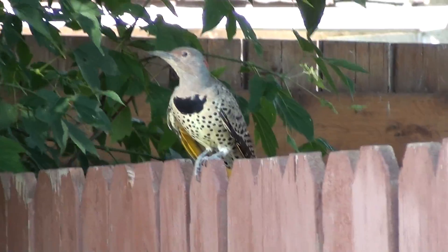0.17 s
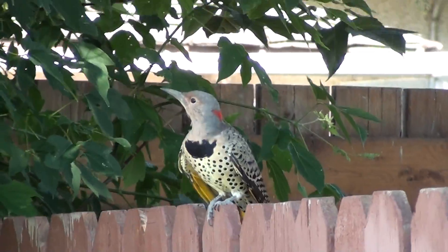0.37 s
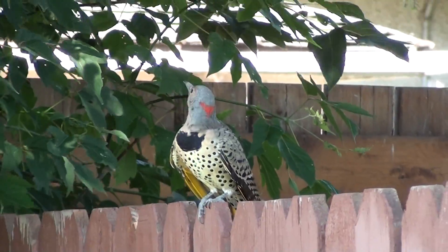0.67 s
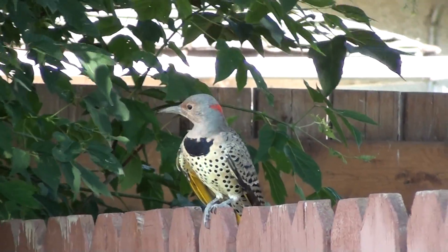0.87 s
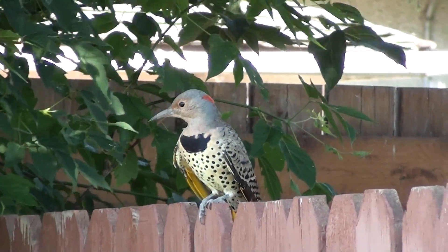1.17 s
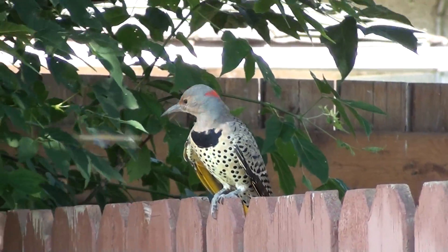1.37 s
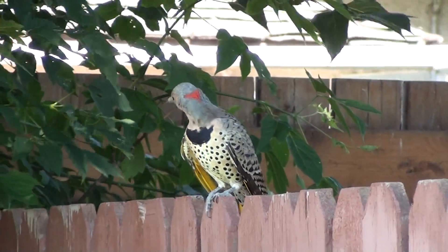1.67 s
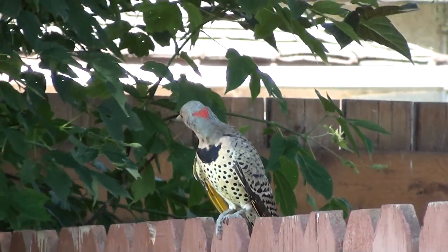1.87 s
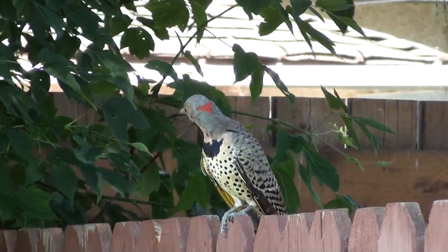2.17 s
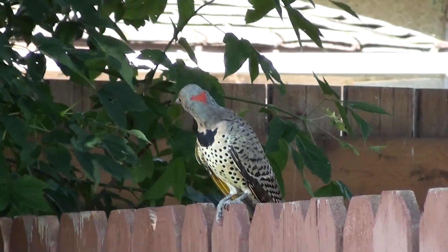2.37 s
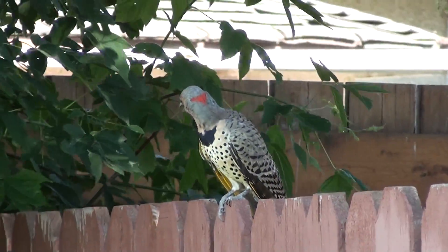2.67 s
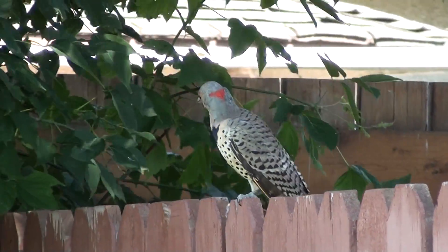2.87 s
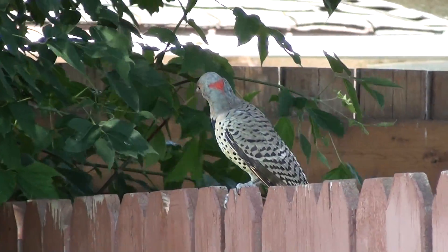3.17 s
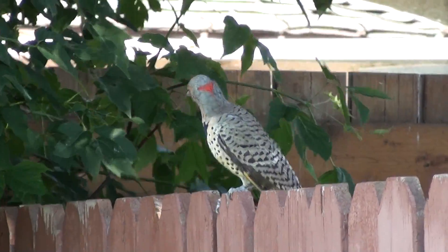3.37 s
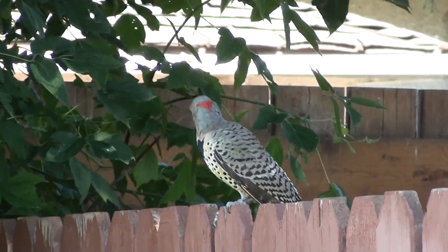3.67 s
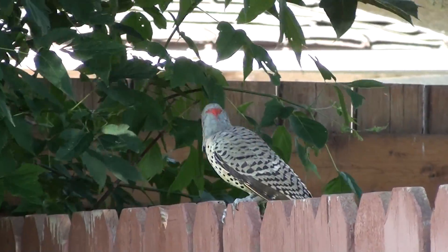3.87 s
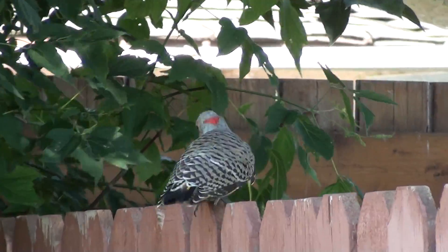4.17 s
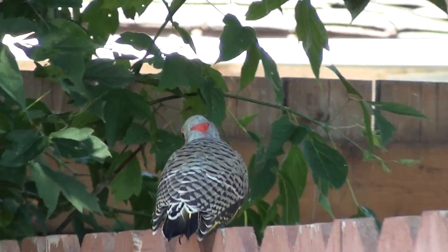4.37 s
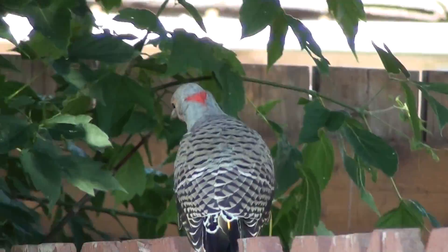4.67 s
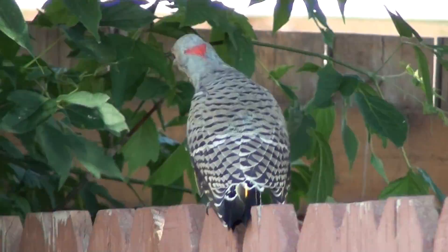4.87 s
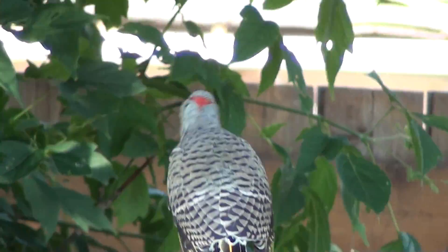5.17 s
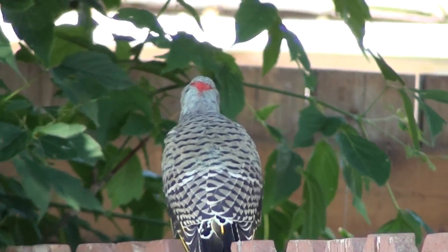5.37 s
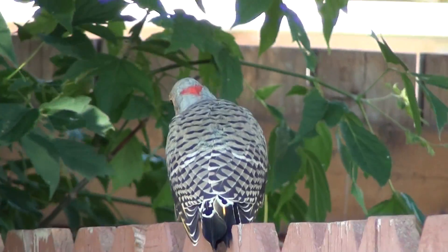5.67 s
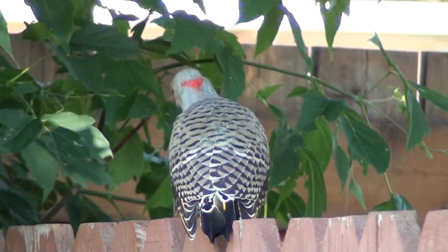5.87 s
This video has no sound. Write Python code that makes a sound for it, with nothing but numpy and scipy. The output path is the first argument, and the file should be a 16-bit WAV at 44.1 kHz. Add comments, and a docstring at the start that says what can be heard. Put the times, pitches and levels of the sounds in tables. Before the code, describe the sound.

Handheld camera outdoors: steady faint hiss, low distant traffic, sparse tiny chirps. Just before the middle comes a woodpecker's abrupt bright call, a short squeaky cry dropping in pitch with a brief yard echo. Then a faint engine climbs streets away, light plastic ticks and dry leafy rustles lead to one sharp loud clack, more small chirps, and a second similar cry shortly before the abrupt end.

```python
"""Two loud falling cries of a woodpecker on a backyard fence, echoing off walls nearby.
Small birds chirp far off, dry rustles pass, a vehicle speeds up streets away and the town hums.
The hand-held camera adds hiss, ticks of its plastic body and the thin whine of its lens motor.
Cries are overtones of a gliding pitch shaped by a throat; chirps, whine and engine are sine tones;
ticks are short ringing tones; rustles, rumble, hum and hiss are shaped noise."""
import sys
import numpy as np
from scipy import signal
from scipy.fft import rfft, irfft
from scipy.io import wavfile
from scipy.ndimage import uniform_filter1d, map_coordinates

SR = 44100
rng = np.random.default_rng(int(sys.argv[2]) if len(sys.argv) > 2 else 0)


def store_pcm(level_fs):
    """Save levels as 16-bit WAV."""
    pcm = np.round(np.clip(level_fs, -1, 1) * 32767).astype(np.int16)
    wavfile.write(sys.argv[1], SR, np.atleast_2d(pcm).T)


def gain_from_db(level_db):
    """Turn a decibel level (scalar or array-like) into a linear amplitude factor."""
    decades = np.asarray(level_db, float) / 20
    return 10 ** decades


N = 266187  # length of the scene (samples)


def woodpecker():
    """Each cry arrives straight, then off the near walls, then as echoes from the whole yard."""
    # the notes of each cry, one row per shape:
    # (start [s], length [s], pitch over the shape's [ratio], level [dB], added upper overtones [dB])
    cry_notes = [
        [(2.708, 0.0069, 1, -18.5, -1), (2.715, 0.02, 0.99, -14, 0), (2.732, 0.031, 0.98, -8, -3),
         (2.765, 0.17, 0.99, -15.5, 3.5)],
        [(5.674, 0.0065, 1.02, -24, -5), (5.68, .016, 1, -15, -1.5), (5.695, 0.042, 1.01, -8.5, -4),
         (5.728, 0.18, 1.013, -15, 0.5)],
    ]
    # the four notes of a cry, the two sides of the voice box taking turns:
    # (share of the note [0-1], pitch [Hz], level [dB], upper overtones [dB])
    note_shapes = [
        [(0, 3120, -12, -12), (.5, 3110, 0.5, -12), (1, 3040, 2, -12)],
        [(0, 2036, -4, -9), (.23, 1660, -6, -4), (.5, 1607, 0.5, 0.5), (.77, 1850, -0.5, 1),
         (1, 2330, -8.5, -15)],
        [(0, 3423, -13, -30), (.23, 3222, -4.5, -35), (.6, 3134, 1, -50), (.86, 3020, -5.5, -41),
         (1, 3020, -12, -22)],
        [(0, 2206, -16, -15), (.04, 1924, 2, -1), (.1, 1800, -4, 8.5), (.27, 1502, 0, -4.5),
         (.38, 1434, -6.5, 0), (.43, 1261, -4, -4.5), (.51, 1053, -12, 3), (.57, 988, -16, -7),
         (.72, 1006, -19, -8), (1, 950, -25, -14)],
    ]
    # tone of the straight path, one list per cry: (frequency [Hz], level [dB])
    straight_tone = [
        [(1500, -1), (3200, 1), (5500, 0.5), (9000, 1), (14000, -10)],
        [(1500, -2.5), (3200, -0.5), (5500, -0.5), (9000, -0.5), (14000, 3)],
    ]
    # hoarseness of each cry: (flutter at 3 kHz [radians])
    hoarseness = [.1, .13]
    # air hisses as the voice changes sides into the third and fourth note: (level [dB])
    rasp_levels = [-26.5, -32]
    # tone of that hiss: (frequency [Hz], level per Hz [dB])
    rasp_tone = [(3000, -28), (5000, -2), (8500, 2), (11000, -4), (15000, -18)]
    # left-right balance of the cry: (frequency [Hz], left over right [dB])
    cry_lean = [(1500, -1), (3100, -2.1), (4500, .3), (9000, .5), (14000, 0)]
    # walls and fence around the perch: (delay [ms], level [dB], left over right [dB])
    wall_echoes = [(3.965, -14, 2), (5.602, -18.5, 9.5), (8.766, -10.5, 3), (13.544, -11, -1),
                   (17.18, -15, -7), (21.8, -10.5, 3.5), (35.5, -17.5, 7), (44.54, -10.5, -3)]

    out = np.zeros((2, N))
    puff = np.hanning(SR // 100)
    for notes, facing, flutter in zip(cry_notes, straight_tone, hoarseness):
        start = notes[0][0] - .01
        cry = np.zeros(SR // 3)
        for (s, length, ratio, db, bright_db), shape in zip(notes, note_shapes):
            rows = np.array(shape) * [length, ratio, 1, 1] + [s, 0, db, bright_db]
            add(cry, s - start, note(rows, jitter=.002, flutter=flutter))
        for (s, *_), db in zip(notes[2:], rasp_levels):
            hiss = unit(coloured(rng.standard_normal(len(puff)), rasp_tone))
            add(cry, s - start - .004, gain_from_db(db) * puff * hiss)
        near = ports(np.array([cry, 0 * cry]), [(1000, 0.83)], cry_lean)
        add(out, start, coloured(near, facing))
        for ms, db, pan_db in wall_echoes:
            sides = gain_from_db([[db + pan_db / 2], [db - pan_db / 2]])
            add(out, start + ms / 1000, near * sides)
        echoes = yard(cry, cry_lean, gap_ms=22)
        add(out, start, gain_from_db(-3.5) * echoes)
    return out


def note(rows, jitter, flutter):
    """Overtones of a gliding pitch through the throat; the higher ones flutter more."""
    # the voice box favours its octave: (overtone [multiple of the pitch], level [dB])
    voice_box = [(1, -7), (2, -0.5), (3, -8), (4, -8.5), (6, -10.5), (14, -15)]
    # throat and open bill: (frequency [Hz], level [dB])
    throat = [(900, 3), (1200, -9.5), (1600, -2), (2200, 3), (3100, 2.5), (3900, -3), (4400, -5.5),
              (4900, -5.5), (5600, -8), (6300, -6.5), (7600, -11), (9300, -5.5), (11000, -25), (15000, -32)]

    t = np.arange(rows[0][0], rows[-1][0], 1 / SR)
    pitch, db, upper_db = curves(rows, t)
    pitch = uniform_filter1d(pitch, size=90) * (1 + jitter * wobble(496, size=len(t)))
    k = np.arange(1, 15)[:, None]  # overtone numbers
    level_db = np.interp(k, *np.transpose(voice_box)) + along(throat, k * pitch)
    # the upper overtones' level comes in from 4500 Hz and is full at 9000 Hz
    level_db = level_db + upper_db * np.clip((k * pitch - 4500) / 4500, 0, 1)
    # two sets of random curves: one shakes the loudness, one the phase
    curves_each = np.array([[wobble(400, size=len(t)) for _ in k] for _ in "ab"])
    shake = flutter * (k * pitch / 3000) ** 2 * curves_each
    phase = k * 2 * np.pi * np.cumsum(pitch) / SR + shake[1]
    audible = k * pitch < SR / 2.8  # leave out overtones that are too high
    tones = gain_from_db(level_db) * (1 + np.tanh(shake[0])) * audible * np.sin(phase)
    soft_ends = signal.windows.tukey(len(t), min(1, 120 / len(t)))
    return gain_from_db(db) * soft_ends * tones.sum(0)


def yard(x, lean, gap_ms):
    """Scattered echoes build up over gap_ms, then each frequency dies away at its own speed."""
    # (frequency [Hz], time to fade by 60 dB [s])
    fade_times = [(900, 0.46), (2000, 0.392), (3200, 0.47), (6000, 0.46), (9000, 0.25), (14000, 0.67)]
    # (frequency [Hz], left-right likeness [0-1])
    echo_likeness = [(1000, .92), (3000, .88), (5000, .78), (9000, .96), (12000, .998)]

    hz, t, z = signal.stft(rng.standard_normal((2, SR // 2)), SR, nperseg=256)
    fading = gain_from_db(-60 * t / along(fade_times, hz)[:, None])
    tail = signal.istft(z * fading, SR, nperseg=256)[1]
    build_up = 1 - np.exp(-np.arange(tail.shape[1]) / SR * 1000 / gap_ms)
    tail = tail / np.linalg.norm(tail[0]) * build_up
    return signal.fftconvolve(x[None], ports(tail, echo_likeness, lean), axes=1)


def clear_whistles():
    """Far small birds whistle short clear glides of a sine tone."""
    # (start [s], length [s], from [Hz], to [Hz], level [dB])
    whistle_calls = [ (.477, 0.011, 6450, 7300, -46), (.55, 0.0079, 5300, 6900, -41.5),
                     (.559, .02, 6954, 6750, -44), (.577, 0.019, 6770, 7150, -44),
                     (.598, .005, 6940, 3130, -41.5), (.623, .01, 7300, 7100, -42.5),
                     (.658, .01, 5300, 5350, -51), (.67, 0.01, 3000, 2700, -51),
                     (.68, .009, 5800, 5350, -45), (.693, 0.015, 5900, 6030, -42),
                     (.69, 0.025, 4236, 4360, -52), (.704, 0.0091, 4350, 2800, -50),
                     (.744, .0063, 4400, 3100, -53), (1.275, 0.0167, 5040, 5140, -56),
                     (1.293, 0.056, 5320, 5250, -56), (1.298, .02, 5800, 6000, -54),
                     (5.014, .01, 5330, 6500, -48), (5.035, 0.039, 6600, 7194, -44),
                     (5.068, .0057, 6800, 3700, -43), (5.127, .006, 5400, 6100, -50),
                     (5.139, .013, 2760, 5600, -48), (5.154, 0.0203, 5400, 6050, -48),
                     (5.16, .014, 4420, 4640, -50), (5.171, 0.0088, 5300, 2900, -48)]
    return small_birds(whistle_calls, rough=0.13, pan_db=-0.12, echo_db=-5.5, gap_ms=1.9)


def hoarse_cheeps():
    """Birds deeper in the yards cheep in rougher glides with stronger echoes."""
    # (start [s], length [s], from [Hz], to [Hz], level [dB])
    cheep_calls = [(.242, 0.0416, 4200, 3270, -57.5), (.781, .035, 4850, 4010, -56),
                   (.797, 0.048, 3066, 3065, -46), (1.615, .03, 4150, 4200, -53),
                   (1.638, 0.077, 3913, 3180, -54.5), (1.841, 0.055, 4480, 3010, -54),
                   (2.66, .069, 4100, 3328, -51), (3.343, .069, 4720, 3200, -53),
                   (4.02, 0.096, 4145, 3320, -50), (4.93, 0.03, 3980, 3780, -54.5),
                   (5.281, 0.088, 4660, 3310, -52)]
    return small_birds(cheep_calls, rough=0.455, pan_db=1, echo_db=2.5, gap_ms=2.1)


def small_birds(calls, rough, pan_db, echo_db, gap_ms):
    """Whistled glides whose pitch warbles fast, more so when rough, with echoes of the yards."""
    straight = np.zeros(N)
    for s, length, from_hz, to_hz, db in calls:
        u = np.arange(round(length * SR)) / (length * SR)  # share of the call, 0 to 1
        warble = wobble(422.5, size=SR // 4)[:len(u)]
        pitch = (from_hz + (to_hz - from_hz) * u) * (1 + .13 * rough * warble)
        rise_and_fall = np.sin(np.pi * u) ** .5
        add(straight, s, gain_from_db(db) * rise_and_fall * np.sin(2 * np.pi * np.cumsum(pitch) / SR))
    echoes = yard(straight, [(1000, pan_db)], gap_ms)[:, :N]
    return straight * gain_from_db([[pan_db / 2], [-pan_db / 2]]) + gain_from_db(echo_db) * echoes


def camera():
    """Ticks set the plastic body ringing at its own pitches, each tick with its own brightness."""
    # (start [s], peak level [dB], brightness [dB per octave])
    body_ticks = [(0.059, -28.5, -6), (0.076, -30, -0.5), (1.593, -34, 16), (3.179, -44, 4.5),
                  (3.687, -37.5, 11), (3.719, -38, 10), (3.971, -39, 5), (4.002, -42, 1), (4.014, -39, 6.5),
                  (4.152, -32, 10), (4.18, -24.5, 33), (4.561, -5.5, 2), (4.659, -36, -2), (4.736, -36, 1),
                  (4.873, -40, 18)]
    # pitches at which the body rings: (frequency [Hz], level [dB], time to fade by 60 dB [s])
    body_modes = [(540, -27, 0.023), (590, -30.5, 0.057), (810, -21.5, 0.023), (1106, -15, 0.023),
                  (1756, -17.5, 0.021), (2300, -27, 0.037), (2490, -20, 0.022), (3070, -14.5, 0.0093),
                  (3150, -1.5, 0.0033), (3280, -20, 0.019), (4240, -17, 0.02), (4720, -13.5, 0.013),
                  (5680, -20.5, 0.011), (6200, -33, 0.012), (6380, -18.5, 0.011), (7010, -8.5, 0.0049),
                  (7650, -19, 0.0088), (7860, -12, 0.0046), (9130, -27.5, .01), (9720, -26, 0.0095),
                  (10100, -36, .012), (11460, -40, 0.0091)]

    out = np.zeros(N)
    t = np.arange(SR // 20) / SR
    hz, db, t60 = np.transpose(body_modes)[:, :, None]
    soft = 1 - np.exp(-(t / .0003) ** 2)  # softens the first instant
    for s, peak_db, tilt_db in body_ticks:
        level_db = db + tilt_db * np.log2(hz / 4000) + rng.normal(0, 1, hz.shape)
        phase = 2 * np.pi * (hz * t + 0.2 * rng.standard_normal(hz.shape))
        ring = soft * (gain_from_db(level_db - 60 * t / t60) * np.sin(phase)).sum(0)
        add(out, s, gain_from_db(peak_db) * ring / np.abs(ring).max())
    return out


def lens(time):
    """The lens motor sings a few thin unsteady lines whenever it moves."""
    # (frequency [Hz], level [dB])
    motor_lines = [(4400, -2), (5750, -5), (7050, 1), (8100, -15)]
    # (middle [s], level [dB], span [s], brightness [dB per octave])
    motor_moves = [(2.6, -58.5, 0.079, 3), (3.43, -59, .08, 7), (4.44, -66, 0.19, -12)]

    out = np.zeros(N)
    for hz, line_db in motor_lines:
        octaves = np.log2(hz / 7000)
        moving = sum(gain_from_db(db + tilt_db * octaves) * swell(time, s, span)
                     for s, db, span, tilt_db in motor_moves)
        loudness = moving * gain_from_db(line_db + 3 * wobble(25))
        out += loudness * np.sin(2 * np.pi * hz * time + 1.1 * wobble(110))
    return out


def rustle(time):
    """Dry rustles: high noise whose loudness jumps about in clumps."""
    # (middle [s], level [dB], span [s])
    rustle_times = [(4.04, -57, 0.0265), (4.14, -55, 0.017), (4.19, -53, 0.024), (4.35, -59.5, .15),
                    (4.7, -62, 0.052)]
    # (frequency [Hz], level per Hz [dB])
    rustle_tone = [(3000, -25.5), (5500, 0), (8500, 1), (10000, -7), (13000, -9), (16000, -19.5)]

    grains = rush(rustle_tone, patchy_db=4)
    loudness = sum(gain_from_db(db) * swell(time, s, span) for s, db, span in rustle_times)
    return loudness * unit(gain_from_db(3.3 * wobble(90)) * grains)


def vehicle(time):
    """Exhaust tones at multiples of the crank's speed climb with it, a little unsteady."""
    # (time [s], crank speed [turns per second])
    engine_speed = [(2.4, 20), (2.75, 21.9), (3.2, 24.1), (3.6, 26), (3.9, 27), (4.2, 27.7), (4.6, 28.2)]
    # exhaust tones, each carrying over the roofs for a while:
    # (multiple of the crank speed, level [dB], loudest at [s], span [s])
    exhaust_orders = [(5, -48, 3.28, 0.62), (7, -50.5, 3.78, 0.44), (9, -48, 3.87, 0.337),
                      (11, -49, 3.67, 0.35), (12, -50.5, 3.68, 0.48), (13, -53.5, 3.57, 0.26),
                      (14, -49.5, 3.67, 0.2)]

    turn = 2 * np.pi * np.cumsum(curves(engine_speed, time)[0]) / SR
    orders = 0
    for k, db, s, span in exhaust_orders:
        loudness = gain_from_db(db + 1.6 * wobble(5)) * swell(time, s, span)
        orders = orders + loudness * np.sin(k * turn + .5 * wobble(6))
    return orders * gain_from_db([[-.5], [.5]])


def town(time):
    """Far traffic is slowly wavering noise, rumble and hum, over the microphone's own even hiss."""
    # (time [s], rumble level [dB], hum level [dB])
    town_levels = [(0, -53, -48.5), (2.5, -54.5, -47.5), (3, -54, -45.5), (4.5, -55, -46), (5, -58.5, -48),
                   (6, -55.5, -48)]
    # tone of each layer: (frequency [Hz], level per Hz [dB])
    rumble_tone = [(12, -38), (22, -30), (32, -29), (45, -33), (55, -1.5), (65, 5), (97, 2), (140, -1),
                   (200, -24), (260, -35), (440, -120)]
    hum_tone = [(88, -12), (150, 0), (395, -4), (431, -6), (787, -4), (2170, -20), (2370, -37),
                (2470, -11.5), (2660, -27), (3730, -25), (5000, -28), (6500, -26.5), (11000, -120)]
    hiss_tone = [(1180, -1.5), (2000, -2.5), (2380, -4.5), (2460, 0.5), (2670, -3.5), (6310, -8.5),
                 (7640, -7), (15100, -12), (16000, -15)]

    rumble_db, hum_db = curves(town_levels, time)
    low = gain_from_db(rumble_db + 0.31 * wobble(4.0)) * rush(rumble_tone, patchy_db=0.1)
    hum = gain_from_db(hum_db + 1.3 * wobble(4.924)) * rush(hum_tone, patchy_db=0.96)
    hum = hum * gain_from_db([[-.3], [.3]])
    return low + hum + gain_from_db(-54.0) * rush(hiss_tone, patchy_db=1.3)


def rush(spectrum, patchy_db):
    """Stereo noise of rms 1 with patches of random gain."""
    # (frequency [Hz], left-right likeness [0-1])
    noise_likeness = [(60, 0.989), (130, 1), (290, 0.937), (640, 0.84), (1410, 0.63), (3100, 0.603),
                      (6820, 0.83), (15000, 1)]

    z = signal.stft(rng.standard_normal((2, N + 512)), nperseg=512)[2]
    # random gains smoothed over frequency, then over time
    field = uniform_filter1d(rng.standard_normal(z.shape[1:]), 5, 0)
    field = uniform_filter1d(field, 12, 1)
    pair = signal.istft(z * gain_from_db(patchy_db * unit(field)), nperseg=512)[1][:, :N]
    return unit(ports(coloured(pair, spectrum), noise_likeness, [(1000, 0)]))


def ports(pair, alike, lean):
    """Two signals mixed into left and right with a likeness and a balance for each frequency."""
    n = pair.shape[1]
    hz = np.fft.rfftfreq(n, 1 / SR)
    angle = np.arccos(np.clip(along(alike, hz), -1, 1)) / 2
    mid, side = rfft(pair) * [np.cos(angle), np.sin(angle)]
    balance = gain_from_db(np.outer([.5, -.5], along(lean, hz)))
    return irfft(np.array([mid + side, mid - side]) * balance, n)


def coloured(x, spectrum):
    """x shaped by (frequency [Hz], level [dB]) points."""
    n = x.shape[-1]
    return irfft(rfft(x) * gain_from_db(along(spectrum, np.fft.rfftfreq(n, 1 / SR))), n)


def swell(time, s, span):
    """A bell-shaped rise and fall around second s."""
    return np.exp(-((time - s) / span) ** 2 / 2)


def wobble(rate, size=N):
    """A smooth random curve through rate random points a second."""
    return map_coordinates(rng.standard_normal(size // 32 + 8), [np.arange(size) * rate / SR])


def unit(x):
    """x at rms 1."""
    return x / np.sqrt(np.mean(x ** 2) + 1e-20)


def along(points, hz):
    """(frequency [Hz], value) points read on a log axis."""
    f, v = np.transpose(points)
    return np.interp(np.log(hz + 1), np.log(f + 1), v)


def curves(rows, t):
    """Each column after the time, read at times t."""
    s, *cols = np.transpose(rows)
    return [np.interp(t, s, c) for c in cols]


def add(track, s, sound):
    """Mix sound into track from second s."""
    part = track[..., round(s * SR):][..., :sound.shape[-1]]
    part += sound[..., :part.shape[-1]]


def scene():
    """All sources together in left and right."""
    time = np.arange(N) / SR
    birds = clear_whistles() + hoarse_cheeps()
    return woodpecker() + birds + camera() + lens(time) + rustle(time) + vehicle(time) + town(time)


def band_limit(x):
    """A steep low-pass at the top of the band."""
    return signal.sosfilt(signal.butter(12, 16440, fs=SR, output="sos"), x)


def record(dry):
    """The sound opens after a moment of silence and closes quickly at the end."""
    gate = np.interp(np.arange(N) / SR, [.039, .056, 6.034, 6.036], [0, 1, 1, 0])
    return band_limit(dry * gate)


dry = scene()
out = record(dry)
store_pcm(out)
```